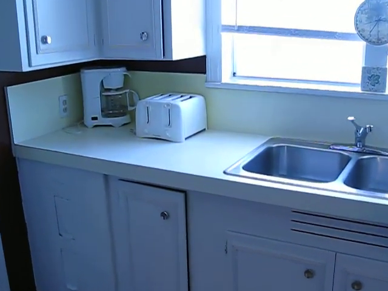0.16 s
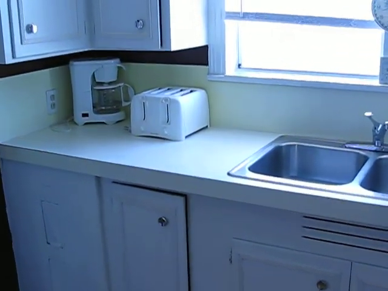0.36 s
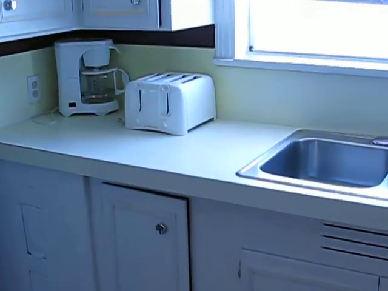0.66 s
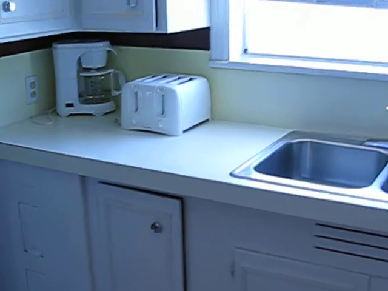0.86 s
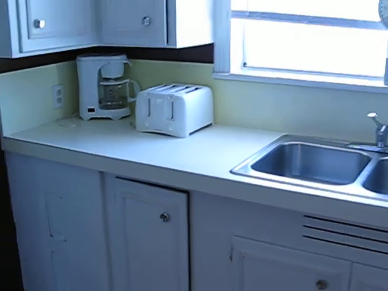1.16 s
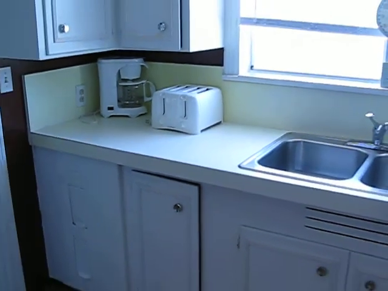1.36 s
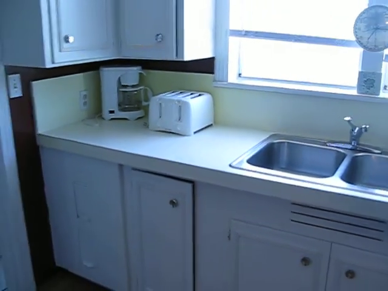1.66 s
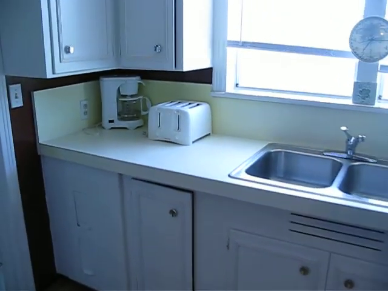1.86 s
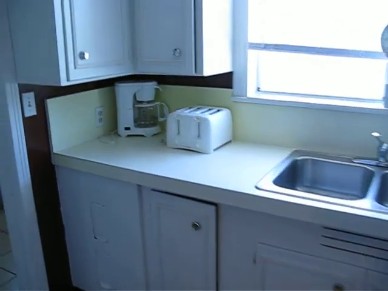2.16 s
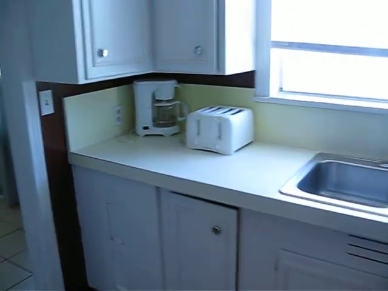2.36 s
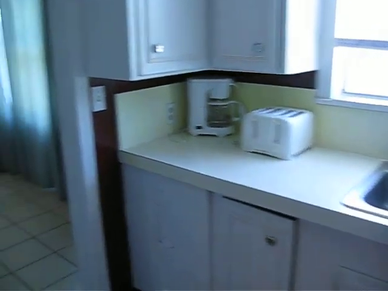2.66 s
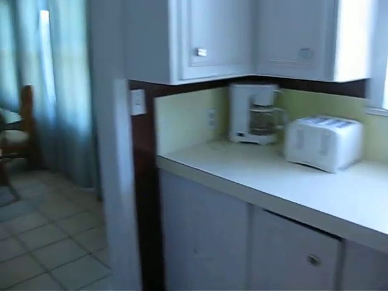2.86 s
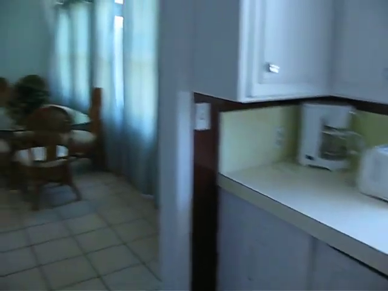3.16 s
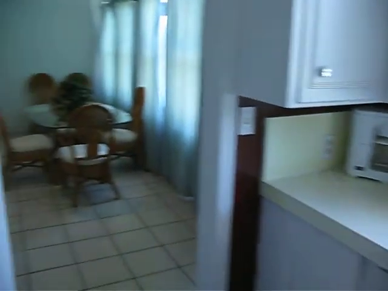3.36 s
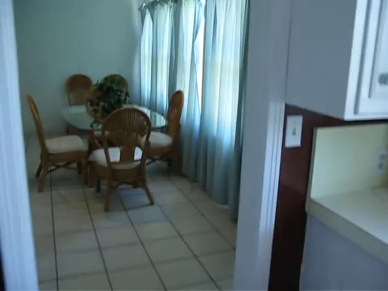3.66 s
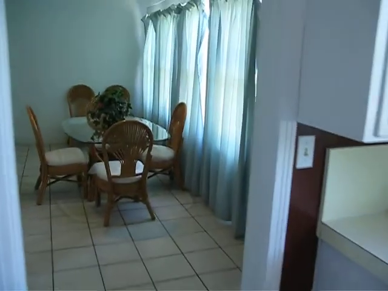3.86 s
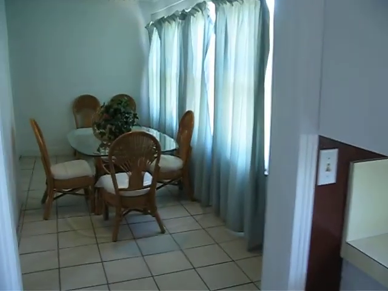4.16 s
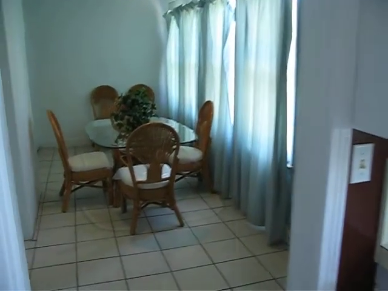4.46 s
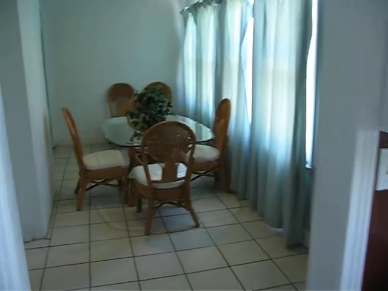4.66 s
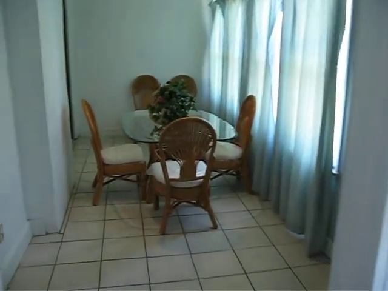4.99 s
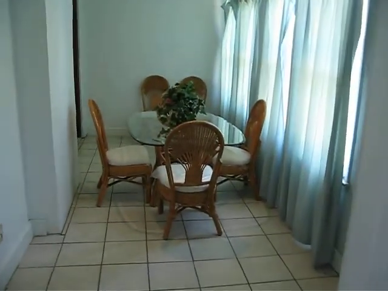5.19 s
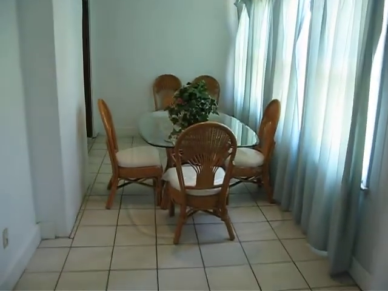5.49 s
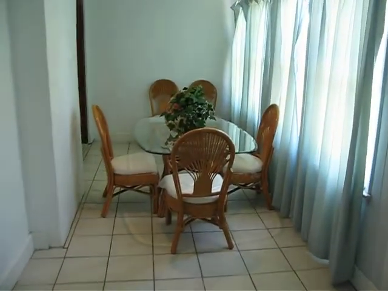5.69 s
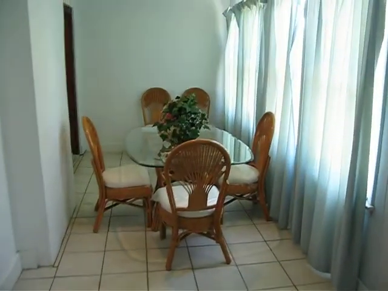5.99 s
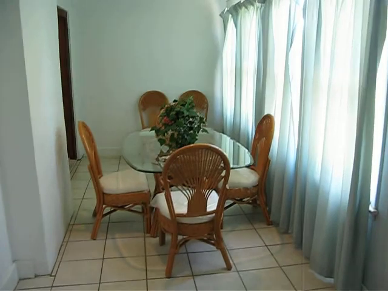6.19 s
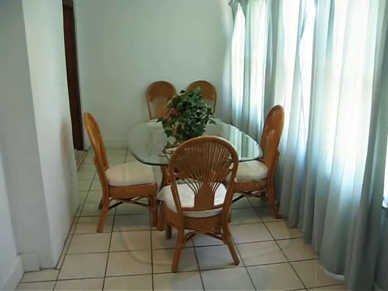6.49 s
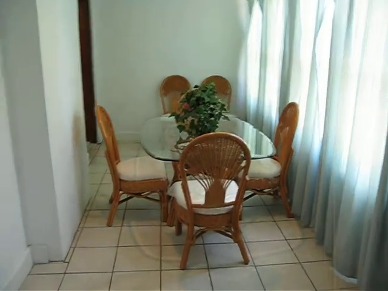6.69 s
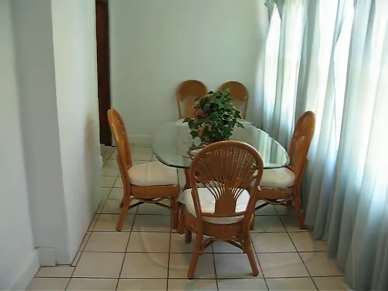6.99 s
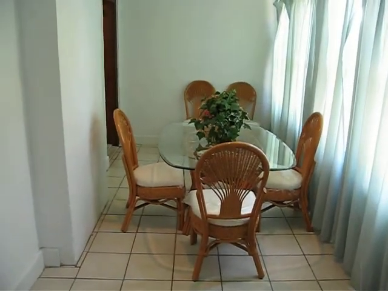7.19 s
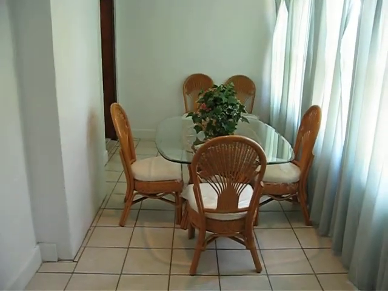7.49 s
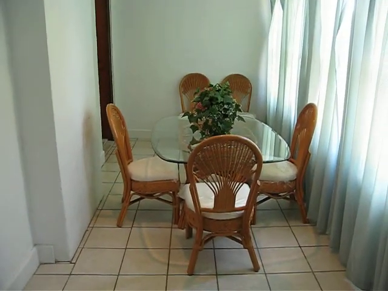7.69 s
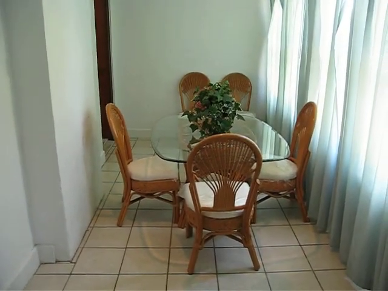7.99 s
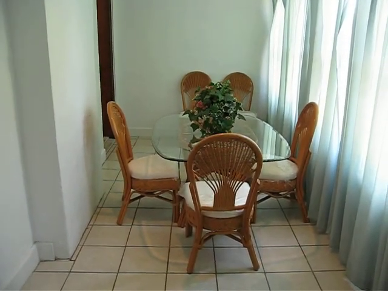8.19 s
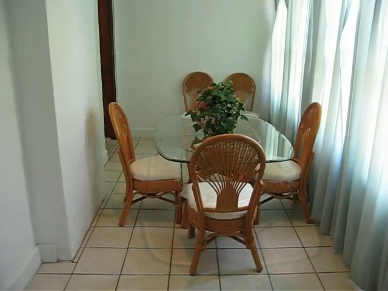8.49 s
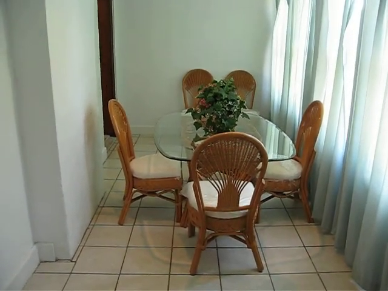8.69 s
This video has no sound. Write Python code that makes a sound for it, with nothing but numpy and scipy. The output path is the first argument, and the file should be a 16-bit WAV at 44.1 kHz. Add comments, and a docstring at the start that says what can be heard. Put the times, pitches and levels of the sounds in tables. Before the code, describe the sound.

Loud dry plastic cracks and snaps right at the microphone, over quiet hiss, with unhurried echoing footsteps and gritty sole scuffs on kitchen tiles.

```python
"""Quiet room air and hiss run throughout. At once, close by, a camera's plastic case ticks, chirps, creaks
and cracks in the hand: skin noise rubs and squeaks, and sudden slips set the case's panels ringing.
Soon a finger slides until it snaps free. Then slow footsteps cross a hard tiled floor, each a heel thud
and a sole slap with room echoes. Between them soles scuff, as showers of grains that wash around the room,
and after the first step, trouser legs swish as swells of fine grains."""
import sys
import numpy as np
from scipy import signal
from scipy.fft import rfft, irfft, next_fast_len
from scipy.io import wavfile
from scipy.ndimage import uniform_filter1d

SR = 44100
rng = np.random.default_rng(int(sys.argv[2]) if len(sys.argv) > 2 else 0)


def to_wav(s):
    """Save 16-bit WAV."""
    ch = np.atleast_2d(s).T  # columns
    pcm = np.round(np.clip(ch, -1, 1) * 32767)  # PCM
    wavfile.write(sys.argv[1], SR, pcm.astype(np.int16))


N = 389844  # length of the scene in samples
T = np.arange(int(.6 * SR)) / SR  # time axis in seconds for one short sound

# Colour of the room air and hiss: pitch_hz, relative level_db (per Hz)
AIR_COLOUR = [(15, -32), (25, -9), (49, -4), (86, -4.5), (161, -3), (194, -2.5), (269, -2), (382, -3),
              (414, -2), (486, -3), (542, -4), (672, -3), (3300, -13.5), (8490, -18), (15800, -27)]
AIR_DB = -49.5  # rms level

# The case ticks lightly as it settles: start_s, peak level_db
TICKS = [(0.2902, -31), (0.6003, -24), (0.672, -34), (3.3992, -20), (5.1218, -30), (7.424, -16)]
TICK_HZ, TICK_KNOCK_DB = 1280, -35  # brightest region; body knock relative to the tick
TICK_CREAK_DB, TICK_CREAK_S = -16.5, .0011  # tiny creak relative to the tick; its build-up and fade

# What the case rings with (under 500 Hz the whole body moves): pitch_hz, relative level_db, time to drop 60 dB_s
CASE_MODES = [(188, -1.5, 0.024), (319, -6.5, 0.1), (1027, 2, 0.011), (1420, 0, 0.016), (1766, 1, 0.013),
              (2090, 3, 0.0071), (2990, -2, 0.0065), (3640, -4.5, 0.01), (4480, -3, 0.01),
              (5440, -6.5, 0.0058), (6670, -16, 0.019), (10600, -21, .03)]

# Colour of plastic creeping on plastic: pitch_hz, level_db
CREAK_COLOUR = [(30, -26), (250, -11.5), (800, -3.5), (1200, 5.5), (2000, 1.5), (2700, -5.5), (3700, 0),
                (4400, -5.5), (5900, -0.5), (8500, -5.5), (10300, -9.5), (13000, -7), (16000, -18)]

# A fingertip catches and chirps: peak_s, level_db, pitch_hz, fade_s
CHIRPS = [(.3645, -31, 6300, .0015), (4.127, -34.5, 3070, 0.0054)]

# The grip tightens, then a seam creeps and cracks: creak_peak_s, crack_peak_db, brightest_hz,
# rebound_db and body_knock_db (both relative to the crack), creak_db, build_up_s, seam_resonance_hz,
# slide_db, after_ring_hz, after_ring_db
SEAM_CRACKS = [(0.3747, -16.5, 1350, 2, -17, -15, 0.0039, 8500, -38.5, 6260, -51),
               (2.2731, -1.5, 1070, -14, -28.5, -10.5, 0.0084, 6000, -58, 2230, -39),
               (4.7319, -0.5, 1480, -3.5, -41, -5.5, .0045, 3570, -49, 10300, -40),
               (7.4326, -5.5, 1530, -24, -48, -13.5, 0.0078, 5960, -66, 10460, -29)]
# cracks start slightly early, so that their filtered peak meets the creak's peak; then the panels spring back
CRACK_LEAD_S, REBOUND_S = .0008, 0.003285
SEAM_DB = 4  # lift of a creak around its seam's resonance
TIGHTEN_S, RING_CYCLES = 0.028, 450  # slide before a creak; cycles until an after-ring is 60 dB down

# A finger slides until it snaps free: snap_s, peak level_db, brightest_hz,
# body_knock_db (relative to the click), slide_db, slide_s
FINGER_SLIPS = [(0.8262, -3, 3450, -32, -41, 0.055), (3.6537, -8, 3230, -24, -43, 0.018),
                (5.7236, -7.5, 2610, -18.5, -43.5, 0.016)]
SQUEAK_HZ, RUB_DB = 5310, 1  # skin on plastic; broad rub relative to the squeak
SLIDE_LEAD, SLIDE_FALL = 0.23, 0.25  # peak before the snap, and fade; both in slide lengths

# How long the room rings: pitch_hz, time to drop 60 dB_s
ROOM_DECAY = [(100, 0.57), (300, 0.39), (480, 0.41), (720, 0.53), (1200, 0.51), (2500, 0.61), (6000, 0.69),
              (14000, 0.83)]

# First echoes from walls and cupboards: typical delay_s, relative gain (plain factor)
ECHOES = [(.0028, 0.31), (.0053, 0.87), (.0085, 0.33), (0.014, .35), (0.018, 0.3)]

# Footfalls: start_s, thud_db, heel_hardness_hz, weight_db (extra bass), sole_slap_db
STEPS = [(1.5248, -28.5, 1060, 5.5, -50), (2.513, -22.5, 1170, 1, -34.5), (3.4844, -22, 1380, -1.5, -33),
         (4.5743, -26.5, 915, 4, -56.5), (5.4851, -21, 1280, -2, -34), (6.4040, -22, 1110, -3, -38.5),
         (8.5870, -35, 1030, -1.5, -45)]

# Colour of the heel's push: pitch_hz, level_db
HEEL_COLOUR = [(50, -28), (110, -21), (160, -11.5), (228, 1), (290, -3), (365, 4), (500, 2), (620, 1),
               (740, 2), (1050, -4.5), (1500, -1.7), (4000, 4.5)]

# Colour of the sole's slap: pitch_hz, level_db
SLAP_COLOUR = [(300, 0), (800, -15), (1500, -12), (2400, -6.5), (3600, -1), (5500, -3), (9000, -10.5),
               (13000, -13.5), (16000, -22)]

# A sole scrapes the tiles: bite_s, level_db, rise_s, fade_s, lower_edge_hz, upper_edge_hz
SCUFFS = [(1.752, -41.5, 0.0069, 0.026, 1990, 4600), (3.713, -31.5, 0.0025, 0.0057, 6130, 14000),
          (3.736, -33.5, 0.021, .02, 800, 7400), (4.817, -43, .014, 0.029, 350, 2480),
          (5.072, -19, .0038, .018, 4300, 8900), (6.367, -21, 0.014, .016, 1840, 3200),
          (7.2, -40, .002, 0.01, 8000, 15000)]
TOUCH_LEAD, TOUCH_DB = 1.93, -20.5  # skim before the bite, in scuff fades; its level next to the bite
SPRAY_DB = -10  # loose grit hissing around the scrape, relative to the sole

# Trouser legs swish as a leg swings: peak_s, level_db, fade_s, lower_edge_hz
SWISHES = [(2.113, -48.5, 0.089, 5900), (3.209, -44, 0.14, 300), (4.006, -46, 0.042, 3000),
           (6.088, -43.5, 0.052, 3400), (7.05, -49.5, 0.21, 700)]
SWISH_RISE = .45  # rise time, in swish fades

# Colour of cloth brushing cloth: pitch_hz, level_db
CLOTH_COLOUR = [(300, 5.5), (800, 5), (2000, -8), (5500, -7.5), (14000, -14.5)]


def undb(db):
    """Turn decibels into a plain amplitude factor."""
    return 10 ** (np.asarray(db) / 20)


def unit(x):
    """Scale so the squared samples add up to 1."""
    return x / np.sqrt(np.sum(x ** 2))


def decay(t, t60):
    """Steady dying-away: 60 dB quieter after t60 seconds."""
    return np.exp(-np.log(1000) * t / t60)


def lookup(points, hz):
    """Read between (Hz, value) points, with pitch spaced as the ear hears it (logarithmically)."""
    point_hz, value = np.transpose(points)
    return np.interp(np.log(np.maximum(hz, 1)), np.log(point_hz), value)


def colour(x, points):
    """Filter x to the given (Hz, dB) curve, with no sound ahead of its cause."""
    size = 2 * next_fast_len(len(x))
    level_db = lookup(points, np.fft.rfftfreq(size, 1 / SR))
    # folding the cepstrum forward in time gives a minimum-phase filter
    cepstrum = irfft(np.log(undb(level_db)))
    cepstrum[1:size // 2] *= 2
    cepstrum[size // 2 + 1:] = 0
    response = np.exp(rfft(cepstrum))
    return irfft(rfft(x, size) * response)[:len(x)]


def butter(x, hz, kind, order=2):
    """Low-, high- or band-pass filter, with its edges kept below the highest possible pitch."""
    edge = np.minimum(hz, .47 * SR)
    return signal.sosfilt(signal.butter(order, edge, kind, fs=SR, output="sos"), x)


def add(out, s, x):
    """Mix x into out from time s."""
    i = int(s * SR)
    out[i:i + len(x)] += x[:max(N - i, 0)]


def noise():
    """Fresh random hiss, equally strong at all pitches."""
    return rng.standard_normal(len(T))


def uneven_noise(spread_db, grain_samples):
    """Noise cut into short grains of randomly uneven level."""
    grain_db = spread_db * np.repeat(noise(), repeats=grain_samples)[:len(T)]
    return noise() * undb(grain_db)


def rise_and_fade(lead, rise, fall):
    """Loudness curve: a bell-shaped rise to 1 at time lead, then an exponential fade."""
    return np.exp(np.where(T < lead, -((T - lead) / rise) ** 2, (lead - T) / fall))


def swell(peak_s, x, rise, fall):
    """Bring steady sound x up to rms 1 at peak_s and fade it: gives (start s, sound)."""
    lead = min(3 * rise, peak_s)
    return peak_s - lead, x / np.std(x) * rise_and_fade(lead, rise, fall)


def air():
    """Steady room air and microphone hiss, made of coloured noise."""
    x = colour(rng.standard_normal(N), AIR_COLOUR)
    return undb(AIR_DB) * x / np.std(x)


def click(s, db, bright_hz, knock_db):
    """A sudden slip rings the panels and knocks the body; its abruptness decides which modes speak."""
    t = T[:len(T) // 2]
    hz, mode_db, t60 = np.transpose(CASE_MODES)
    is_body = hz < 500
    # alternate signs keep the levels between neighbouring modes filled
    sign = (-1) ** np.arange(len(hz))
    fades = sign * undb(mode_db) * decay(t[:, None], t60)
    detune = 1 + 0.014 * rng.standard_normal(len(hz))
    modes = fades * np.sin(2 * np.pi * hz * detune * t[:, None])
    panels = modes[:, ~is_body].sum(axis=1)
    panels = butter(panels, 1.27 * bright_hz, "high", order=2)
    panels = butter(panels, 1.14 * bright_hz, "low", order=3)
    body = modes[:, is_body].sum(axis=1)
    return s, undb(db) * (panels / np.abs(panels).max() + undb(knock_db) * body)


def creak(s, db, build, release, creep_db=-9, snap_s=0.00061):
    """Plastic creeps on plastic in dense tiny slips and lets go in about a millisecond at time s."""
    creep = np.where(T < build, np.sqrt(T / build), np.exp(-np.abs(T - build) / release))
    snap = np.exp(-((T - build) / snap_s) ** 2)
    tiny_slips = np.sign(noise()) * (undb(creep_db) * creep + snap)
    # undo the overall gain of the colouring
    gain = np.linalg.norm(colour(signal.unit_impulse(len(T)), CREAK_COLOUR))
    return s - build, undb(db) * colour(tiny_slips, CREAK_COLOUR) / gain


def ticks():
    """Light ticks of the settling case: each slip is a click with a tiny creak."""
    out = np.zeros(N)
    for s, db in TICKS:
        add(out, *click(s, db, TICK_HZ, TICK_KNOCK_DB))
        add(out, *creak(s, db + TICK_CREAK_DB, TICK_CREAK_S, TICK_CREAK_S))
    return out


def rub(s, db, rise, fall, hz, rub_db, waver=0.0167):
    """Skin slides on the case: a faint squeak of unsteady pitch within a broad rub."""
    drift = uniform_filter1d(noise(), size=32)
    # the more the skin rubs, the less steady its squeak
    unsteadiness = waver * (.5 + 2 * undb(rub_db))
    pitch = hz * (1 + unsteadiness * drift / np.std(drift))
    squeak = np.sin(2 * np.pi * np.cumsum(pitch) / SR)
    hiss = butter(noise(), [1700, 9000], "band", order=1)
    start, sound = swell(s, unit(squeak) + undb(rub_db) * unit(hiss), rise, fall)
    return start, undb(db) * sound


def chirps():
    """A fingertip catches on the plastic: a very short rub that is nearly all squeak."""
    out = np.zeros(N)
    for s, db, hz, fall in CHIRPS:
        add(out, *rub(s, db, rise=0.0018, fall=fall, hz=hz, rub_db=-16))
    return out


def slide(snap_s, db, length):
    """Skin rubs harder, peaks just before the snap and fades into it."""
    return rub(snap_s - SLIDE_LEAD * length, db, length, SLIDE_FALL * length, SQUEAK_HZ, RUB_DB)


def seam(x, hz):
    """A seam resonates, lifting the third of an octave around its pitch."""
    edges = hz * 2 ** (np.array([-1, 1]) / 6)
    return x + (undb(SEAM_DB) - 1) * butter(x, edges, "band", order=1)


def seam_cracks():
    """The grip tightens; a seam creaks, cracks, springs back and leaves a small part ringing."""
    out = np.zeros(N)
    for (s, db, bright_hz, rebound_db, knock_db, creak_db, build_s, seam_hz,
         slide_db, ring_hz, ring_db) in SEAM_CRACKS:
        add(out, *slide(s, slide_db, TIGHTEN_S))
        start, slips = creak(s, creak_db, build_s, release=0.0036)
        add(out, start, seam(slips, seam_hz))
        crack_s = s - CRACK_LEAD_S
        add(out, *click(crack_s, db, bright_hz, knock_db))
        add(out, *click(crack_s + REBOUND_S, db + rebound_db, bright_hz, knock_db))
        after_ring = np.sin(2 * np.pi * ring_hz * T) * decay(T, RING_CYCLES / ring_hz)
        add(out, s, undb(ring_db) * after_ring)
    return out


def finger_slips():
    """A finger slides on the case, then snaps free and sets it ringing."""
    out = np.zeros(N)
    for s, db, bright_hz, knock_db, slide_db, slide_s in FINGER_SLIPS:
        add(out, *slide(s, slide_db, slide_s))
        add(out, *click(s, db, bright_hz, knock_db))
    return out


def grip():
    """The case in the hand: ticks, chirps, cracking seams and slipping fingers."""
    return ticks() + chirps() + seam_cracks() + finger_slips()


def tail(build_s, grain_db=3):
    """Uneven scattered echoes thicken over build_s; each half octave then dies at its own pace."""
    edges = np.geomspace(70, 18000, 17)
    spectrum = rfft(uneven_noise(grain_db, grain_samples=16))
    hz = np.fft.rfftfreq(len(T), 1 / SR)
    build = 1 - np.exp(-T / build_s)
    out = 0
    for lo, hi in zip(edges, edges[1:]):
        band = irfft(spectrum * (hz >= lo) * (hz < hi), len(T))
        fade = decay(T, lookup(ROOM_DECAY, np.sqrt(lo * hi)))
        # wider bands carry more energy
        out = out + np.sqrt(hi - lo) * unit(band * fade * build)
    return unit(out)


def room(direct_db, build_s):
    """Floor to microphone: direct sound, first echoes that shift as the walker moves, scattered tail."""
    early = np.zeros(len(T))
    early[0] = 1
    for delay, gain in ECHOES:
        shift = 1 + .04 * rng.standard_normal()
        early[int(delay * SR * shift)] += gain
    return unit(undb(direct_db) * unit(early) + tail(build_s))


def footsteps(crunch_db=-7):
    """The heel gives one soft push; the sole slaps on grit just after, heard mostly off the walls."""
    out = np.zeros(N)
    blow = signal.unit_impulse(len(T))
    heel = colour(-blow, HEEL_COLOUR)
    tenth_second = np.sqrt(SR / 10)  # makes each level an rms over 0.1 s
    for s, thud_db, hard_hz, weight_db, slap_db in STEPS:
        # a heavy tread adds bass, a hard landing adds treble
        weighted = colour(heel, [(220, weight_db), (450, 0)])
        push = butter(weighted, hard_hz, "low", order=3)
        thud = signal.fftconvolve(push, room(direct_db=-2.0, build_s=0.0025))
        crunch = unit(noise() * np.exp(-T / 0.0055))
        sole = colour(blow + undb(crunch_db) * crunch, SLAP_COLOUR)
        slap = signal.fftconvolve(sole, room(direct_db=-13, build_s=0.008))
        add(out, s, tenth_second * undb(thud_db) * unit(thud))
        add(out, s + .003, tenth_second * undb(slap_db) * unit(slap))
    return out


def with_wash(x, wash, room_db, t60):
    """Friction sound x, plus the smooth wash that the room gathers from its energy."""
    keep = decay(1 / SR, t60) ** 2  # share of the room's energy left after each sample
    energy = signal.lfilter([1 - keep], [1, -keep], x ** 2)
    room_wash = undb(room_db) * np.sqrt(energy) * wash / np.std(wash)
    return (x + room_wash) / np.sqrt(2)


def scraped(x, lo_hz, hi_hz):
    """Colour of a scrape: the sole's own band over a broad spray of loose grit."""
    sole = butter(butter(x, lo_hz, "high", order=5), hi_hz, "low")
    spray = butter(noise(), [400, 13200], "band")
    return unit(sole) + undb(SPRAY_DB) * unit(spray)


def scuffs(grit_db=4):
    """A sole skims with a thin hiss, bites and drags over grit in a shower of uneven grains."""
    out = np.zeros(N)
    for s, db, rise, length, lo_hz, hi_hz in SCUFFS:
        scrape = scraped(uneven_noise(grit_db, grain_samples=24), lo_hz, hi_hz)
        wash = scraped(noise(), lo_hz, hi_hz)
        lead = TOUCH_LEAD * length
        pressure = rise_and_fade(lead, rise, length)
        skim = butter(noise(), [3570, 13000], "band")
        touch = undb(TOUCH_DB) * (T < lead) * skim / np.std(skim)
        bite = with_wash(pressure * scrape / np.std(scrape), wash, room_db=1.5, t60=0.49)
        add(out, s - lead, undb(db) * (touch + bite))
    return out


def brushed(x, lo_hz):
    """Colour of cloth on cloth, with the sound below lo_hz weakened."""
    return butter(colour(x, CLOTH_COLOUR), lo_hz, "high", order=3)


def swishes(weave_db=3):
    """Cloth brushes past cloth: a soft swell of fine grains."""
    out = np.zeros(N)
    for s, db, length, lo_hz in SWISHES:
        brush = brushed(uneven_noise(weave_db, grain_samples=24), lo_hz)
        wash = brushed(noise(), lo_hz)
        start, swish = swell(s, brush, SWISH_RISE * length, length)
        add(out, start, undb(db) * with_wash(swish, wash, room_db=-2.5, t60=0.8))
    return out


def scene(case_room_db=-28):
    """The air, the case at the microphone, and the walker in the room."""
    case = grip()
    # the case is so near that the room adds almost nothing to it
    case_echo = undb(case_room_db) * signal.fftconvolve(case, tail(build_s=0.0025))[:N]
    return (air() + case + case_echo + footsteps() + scuffs() + swishes())[None]


def record(dry, ceiling=0.62):
    """The input stage flattens the loudest peaks, and the top above 15900 Hz is cut."""
    rounded = dry / (1 + (dry / ceiling) ** 6) ** (1 / 6)
    top_cut = signal.ellip(10, .2, 70, 15900, fs=SR, output="sos")
    return signal.sosfilt(top_cut, rounded)


dry = scene()
out = record(dry)
to_wav(out)
```